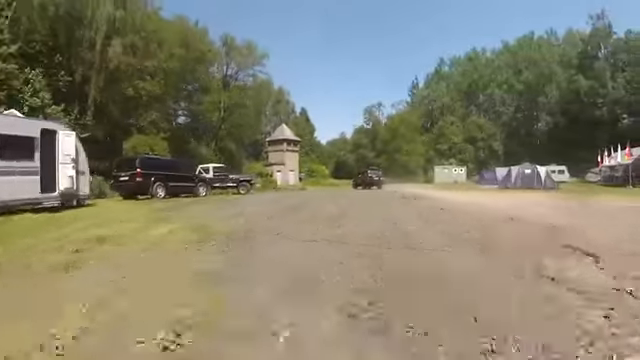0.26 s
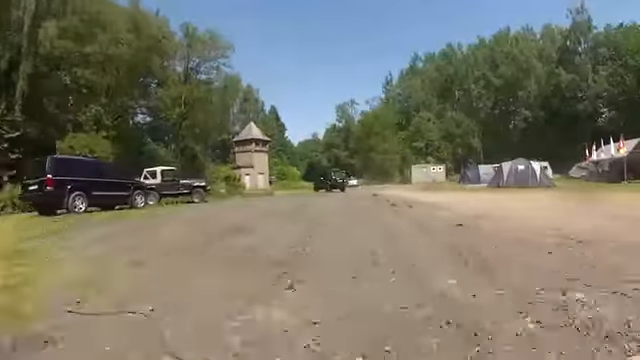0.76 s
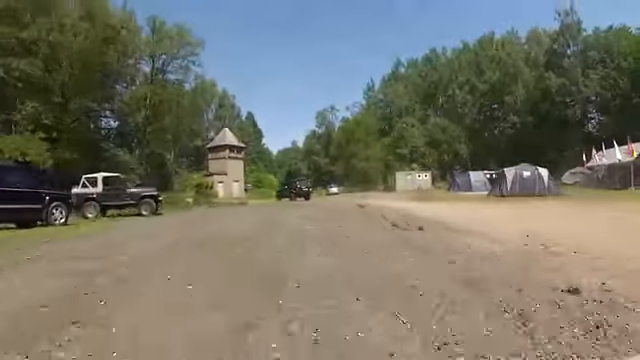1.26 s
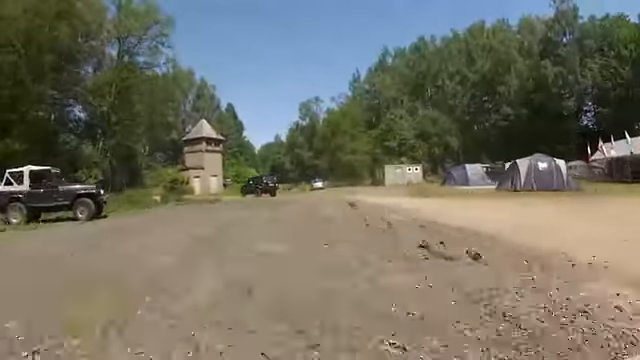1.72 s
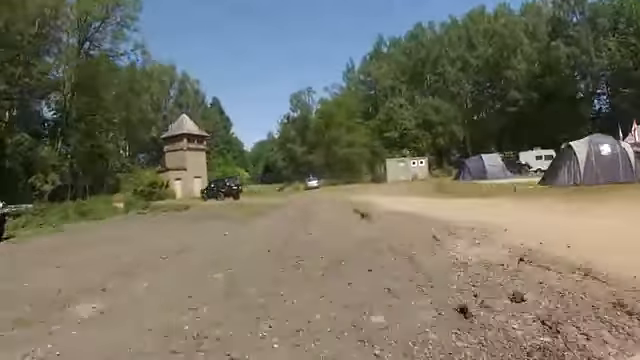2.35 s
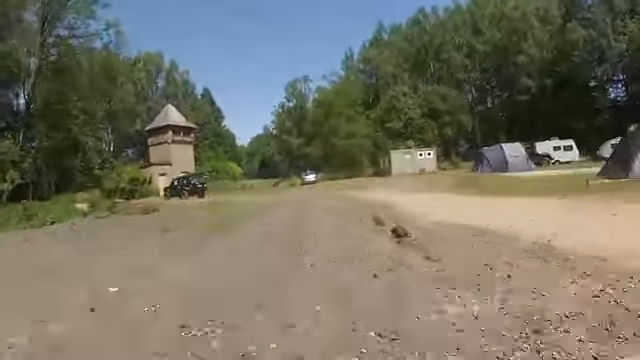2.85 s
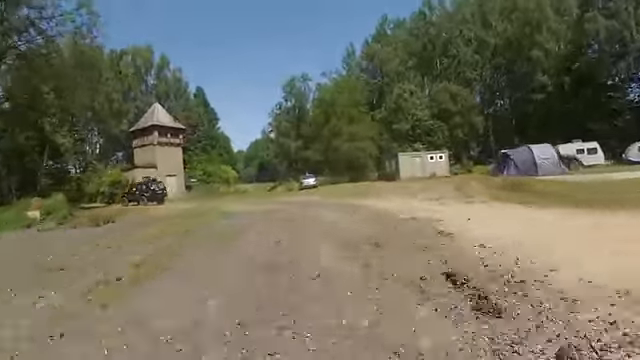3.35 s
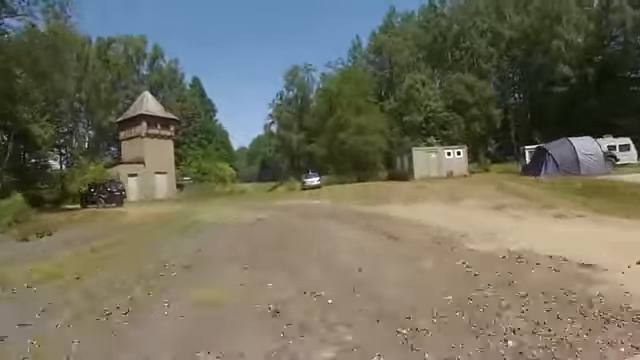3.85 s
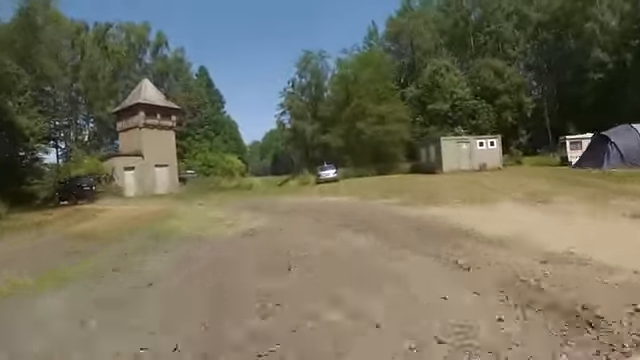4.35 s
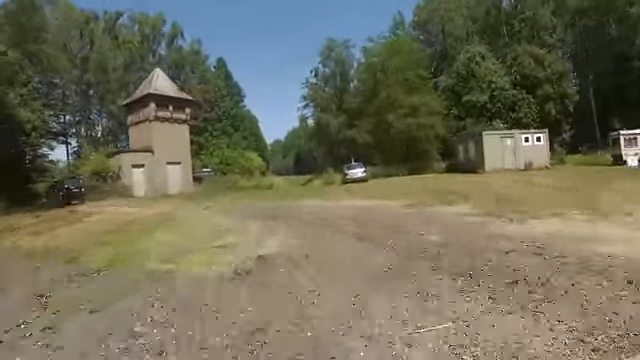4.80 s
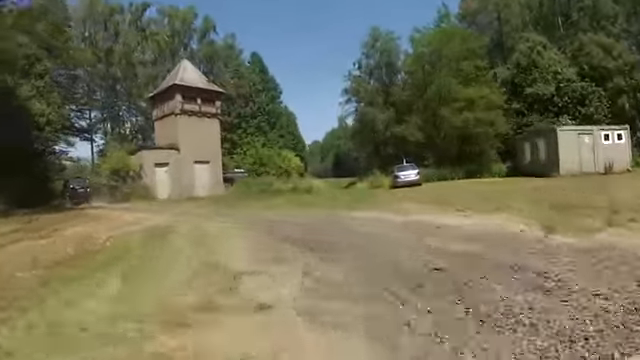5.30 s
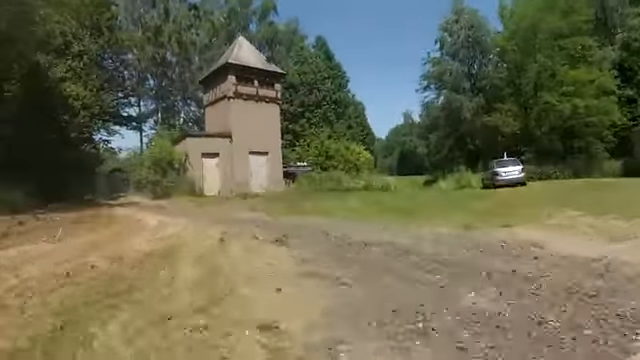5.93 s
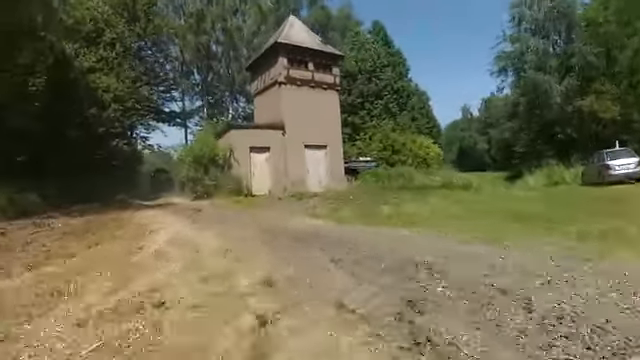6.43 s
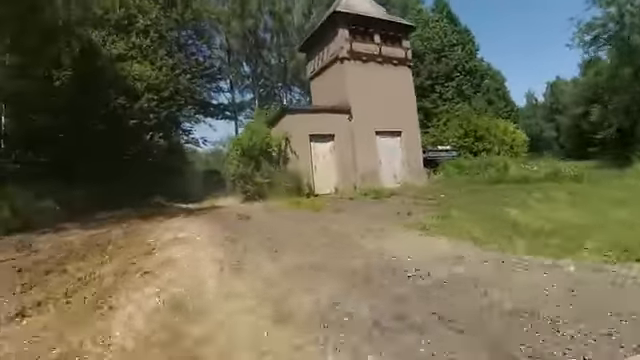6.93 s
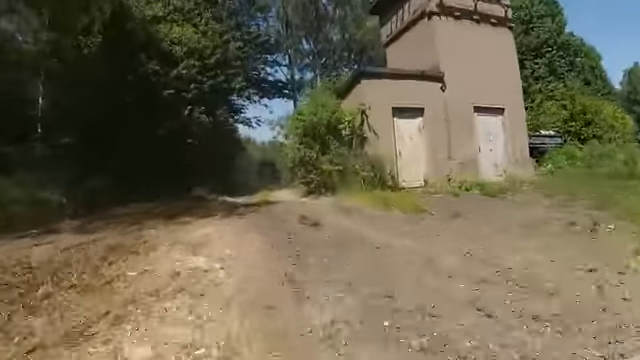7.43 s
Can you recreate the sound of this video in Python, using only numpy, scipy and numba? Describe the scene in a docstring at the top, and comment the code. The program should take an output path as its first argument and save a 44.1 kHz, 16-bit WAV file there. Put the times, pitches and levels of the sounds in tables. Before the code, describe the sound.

Heavy low droning and bumping from a vehicle on a rough track, crackling at its loudest swells, with sharp stone clicks and a brief squeak.

```python
"""A deep wavering boom and shudder come first, over tyre rumble, panel buzz, faint gear whine, hum and hiss.
A camera is bolted to an off-road vehicle rolling over a dirt track: the chassis boom is one unsteady tone,
its shudder and sway are noise in narrow resonances, and engine clatter rings the panels. Stones tick as damped
plate modes, bumps thud as body modes and a joint squeaks briefly. The camera's gain control steps down
on tall boom crests, which crackles."""
import sys
import numpy as np
from scipy import signal
from scipy.fft import rfft, irfft, next_fast_len
from scipy.io import wavfile
from scipy.ndimage import uniform_filter1d, map_coordinates
from numba import njit

SR = 44100
rng = np.random.default_rng(int(sys.argv[2]) if len(sys.argv) > 2 else 0)


def int16_out(signal):
    """Quantize to a 16-bit WAV file."""
    q = np.round(np.clip(np.atleast_2d(signal).T, -1, 1) * 32767)
    wavfile.write(sys.argv[1], SR, q.astype(np.int16))


def makeup_ratio(level_db):
    """Linear amplitude ratio for a level in decibels (20 dB per factor of ten)."""
    decades = np.asarray(level_db, float) / 20
    return 10 ** decades


N = 337806  # samples

# Chassis boom pitch before its random waver: (time [s], frequency [Hz])
BOOM_PITCH = [(0.0, 55.8), (0.79, 50.9), (1.02, 58.1), (1.23, 53.7), (1.73, 58.5), (2.28, 49.8),
              (3.18, 55.5), (3.52, 50.4), (4.29, 54.2), (5.74, 50.8), (6.04, 56.2), (6.19, 49.8),
              (6.63, 53.4), (7.66, 52.5)]
# Ground jolts that knock the boom out of step: (time [s], level aimed at [dB], sag [dB/s])
BOOM_JOLTS = [(.049, -15.5, 0), (.35, -16, 0), (.638, -15, 50), (.754, -14, 50), (.892, -13.5, 50),
              (1.044, -12, 25), (1.423, -11, 35), (1.596, -17, 20), (1.688, -11.5, 60), (1.822, -14.5, 30),
              (1.913, -11, 50), (2.026, -11, 50), (2.247, -11, 35), (2.486, -10.5, 45), (2.623, -14, 35),
              (2.83, -14.5, 5), (2.995, -11, 15), (3.16, -24, 20), (3.235, -12.5, 20), (3.495, -13.5, 50),
              (3.624, -16.5, 30), (3.716, -15, 30), (3.809, -15, 0), (3.985, -13.5, 30), (4.086, -14, 30),
              (4.184, -11.5, 55), (4.313, -17.5, 0), (4.431, -11.5, 40), (4.606, -10.5, 55),
              (4.721, -10, 40), (5.027, -12, 50), (5.148, -10.5, 20), (5.587, -15, 45), (5.731, -11.5, 60),
              (5.85, -11.5, 45), (5.976, -12, 35), (6.157, -9.5, 55), (6.4, -10.5, 55), (6.543, -15, 25),
              (6.688, -11, 55), (7.029, -13, 35), (7.122, -10.5, 50), (7.364, -13.5, 5)]
# Weaker modes beside the boom, each before squaring: (frequency [Hz], width [Hz], level [dB])
FLANK_MODES = [(42.37, 8, -2), (62.65, 7.2, 1)]
# Axle sway resonance, before squaring: (frequency [Hz], width [Hz], level [dB])
SWAY_MODES = [(32.94, 11, 0)]
# Axle sway strength: (time [s], level [dB])
SWAY_LEVEL = [(0, -24), (.5, -28), (1.2, -32), (1.75, -29), (2.2, -21), (2.7, -22), (3.0, -28), (3.7, -23),
              (3.9, -33), (4.5, -27), (5.06, -26), (5.27, -38), (5.45, -23), (6.1, -20), (6.3, -27),
              (6.7, -21), (7.66, -28)]
# Frame modes, relative levels: (frequency [Hz], width [Hz], level [dB])
SHUDDER_MODES = [(86.4, 7.52, 2.5), (102.1, 17, -3.5), (118.3, 10.65, -11), (139.9, 10, -18.5),
                 (148.8, 20, -24.5)]
# Track roughness and engine effort, before bumps add to the first two levels:
# (time [s], frame shudder level [dB], tyre rumble level [dB], panel buzz level [dB])
RUNNING_LEVELS = [(0, -28.5, -46, -51), (.17, -30, -51, -53), (.5, -29, -46.5, -51.5),
                  (1.1, -29, -47.5, -49), (1.27, -36, -48, -52), (1.42, -26, -44, -49),
                  (1.56, -28, -48, -52), (2.05, -26, -42.5, -46), (2.5, -31, -47, -48),
                  (2.8, -26.5, -46, -48.5), (3.05, -27, -44, -50), (3.15, -35, -47, -56),
                  (3.8, -28, -47, -52), (4.0, -35, -51, -54), (4.45, -29, -52, -52), (5.2, -33, -47, -54),
                  (5.45, -38, -53, -57), (5.75, -31, -49, -53), (6.3, -32, -46, -52.5),
                  (6.6, -27, -48, -52), (7.0, -34, -52, -54), (7.66, -32, -48, -52)]
# Tyre rumble spectrum, relative: (frequency [Hz], level [dB per Hz])
TYRE_SPECTRUM = [(130, -0.5), (175, -9), (330, -12.5), (360, -12), (422, -11), (442, -24.5), (800, -31.5),
                 (1500, -46)]
# Panel resonances, before the 3/2 power that sharpens them: (frequency [Hz], width [Hz], level [dB])
PANEL_MODES = [(405.4, 18, 3.5), (596.4, 47, -1.5), (1022.6, 49, 1), (1376, 37, -9), (1400, 98, 1.5),
               (1474, 100, -2), (1978, 66, -1), (2170, 41, 4), (2390, 300, -10.5), (3300, 300, -24.5),
               (4750, 50, -24)]
# Direct engine clatter spectrum, relative: (frequency [Hz], level [dB per Hz])
CLATTER_SPECTRUM = [(400, -16), (800, -10.5), (1700, -7.5), (2300, -8), (2750, -20.5), (3400, -18),
                    (4500, -37), (7000, -50.5), (10000, -62)]
# Gear whine before its flutter: (time [s], frequency [Hz], level [dB])
GEAR_TRACK = [(0, 1355, -58), (.4, 1327, -59), (.7, 1395, -52), (1.1, 1430, -53.5), (1.25, 1440, -86),
              (1.5, 1265, -72.5), (1.65, 1300, -59.5), (1.9, 1333, -55), (2.25, 1297, -56.5),
              (2.5, 1275, -50.5), (2.65, 1304, -79.5), (7.66, 1236, -78.5)]
# Panel hum before its flutter: (time [s], frequency [Hz], level [dB])
HUM_TRACK = [(0, 600.5, -57), (1.2, 598.3, -63.5), (2, 594, -55), (2.8, 598.6, -61), (3.3, 598, -75.5),
             (7.66, 603, -75.5)]
# Thin tones of the camera electronics, ahead of the microphone response: (frequency [Hz], level [dB])
WHINE_LINES = [(9111, -88), (9135, -87)]
# Hiss spectrum, relative: (frequency [Hz], level [dB per Hz])
HISS_SPECTRUM = [(2000, 0), (6000, -6), (10000, -8.5), (15500, -24.5)]
# Stone strikes: (time [s], level [dB], crack relative level [dB], strongest ring [Hz], damping factor [x])
STONE_STRIKES = [(.0458, -20.5, -17.5, 1970, 1.2), (2.827, -35.5, -4.5, 2180, 1.4),
                 (2.8993, -25.5, -29, 1983, 2.05), (2.9263, -22.5, -1.5, 1460, 1.9),
                 (2.9655, -45, -15.5, 1500, 1.8), (3.0645, -19, -24.5, 2440, 1.2),
                 (3.0695, -24, -22, 2303, 1.124), (3.5105, -27.5, -16, 1770, 2.17),
                 (5.094, -44.5, -9, 4643, 1.6), (5.421, -52, -9, 4800, 1.3), (5.672, -29, -27, 1100, 1.22),
                 (5.676, -39, -35, 1997, 1.49), (6.6049, -32.5, -20.5, 1400, 1.656)]
# Modes of the struck plate at damping factor 1: (frequency [Hz], relative level [dB], 60 dB decay time [s])
PLATE_MODES = [(1100, -1.5, 0.04), (1524, 4.5, 0.022), (1680, -0.5, 0.033), (1670, -3, 0.023),
               (2030, 4, .04), (2150, -1.5, 0.053), (2455, -3.5, 0.094), (3340, -12, 0.044),
               (3920, -9, 0.058), (4460, -6, 0.034), (4680, -1, 0.05), (5330, 0.5, 0.033), (7300, -3, .02)]
# Bumps: (time [s], level [dB], upper modes' relative level [dB])
BUMP_BLOWS = [(0.712, -23.5, -15), (0.955, -26, -6), (1.342, -27.5, -15), (1.392, -26, -20),
              (1.593, -26, -10.5), (1.671, -23, -9.5), (1.877, -29.5, 5.5), (2.115, -29, -26),
              (2.196, -26.5, -10), (2.605, -32.5, 4), (3.015, -30, -7), (3.815, -30, -21),
              (4.479, -39, -19), (6.502, -32.5, -19.5), (6.716, -24, -4)]
# Body modes, two low then two upper: (frequency [Hz], 60 dB decay time [s])
BODY_MODES = [(246, 0.19), (268, 0.09), (358, 0.1), (415, 0.11)]
# Squeaking joint before its flutter: (time [s], frequency [Hz], level [dB])
SQUEAK_TRACK = [(1.32, 3060, -85), (1.36, 3110, -62), (1.39, 3310, -55), (1.42, 3170, -61),
                (1.54, 3320, -60), (1.58, 3380, -72), (1.63, 3430, -57), (1.66, 3270, -62),
                (1.7, 3370, -63), (1.74, 3400, -85)]
# Microphone frequency response: (frequency [Hz], level [dB])
MICROPHONE_RESPONSE = [(5, 1), (7000, -1), (11000, -2.5), (15000, -5.5), (16500, -32.5)]


def unit(x):
    """Normalisation: scales a signal to rms 1."""
    return x / np.sqrt(np.mean(x ** 2) + 1e-20)


def curves(rows):
    """Linear interpolation: one value per sample for each column after the time."""
    s, *columns = np.transpose(rows)
    return [np.interp(np.arange(N) / SR, s, column) for column in columns]


def wobble(rate):
    """Band-limited fluctuation: a smooth random curve with rate knots a second."""
    knots = rng.standard_normal(int(N * rate / SR) + 4)
    return map_coordinates(knots, [np.arange(N) * rate / SR])


def filtered(x, response):
    """Linear filtering: the spectrum is multiplied by a complex response of frequency."""
    m = next_fast_len(N + SR // 2)
    hz = np.fft.rfftfreq(m, 1 / SR)
    return irfft(rfft(x, m) * response(hz), m)[:N]


def colour(points):
    """Spectral shaping: gain interpolated on a log frequency axis, shut outside the points."""
    f, db = np.transpose(points)
    return lambda hz: makeup_ratio(np.interp(np.log(hz + 1), np.log(f), db, left=-120, right=-120))


def resonance(hz, centre, width, db):
    """Damped oscillator: the causal response of one mode."""
    return makeup_ratio(db) * 1j * hz * width / (centre * centre - hz * hz + 1j * hz * width)


def modes(rows):
    """Modal superposition: resonances summed with alternating sign."""
    return lambda hz: sum((-1) ** k * resonance(hz, *row) for k, row in enumerate(rows))


def steep(rows):
    """Cascaded resonance: the modal response applied twice, for dark skirts."""
    return lambda hz: modes(rows)(hz) ** 2


def peaks(rows):
    """Uncoupled resonators: separate parts add without cancelling, with dark valleys between them."""
    return lambda hz: np.sqrt(sum(np.abs(resonance(hz, *row)) ** 3 for row in rows))


def swells():
    """Phase interference: each jolt resets the boom about half a turn out of step, so it dips, swells and sags."""
    start_db, lead_s, settle_s = -15, .016, .028
    scatter_rad = .45  # about the half turn
    t = np.arange(N) / SR
    jolts = [(0, start_db, 0)] + [(s - lead_s, db, sag) for s, db, sag in BOOM_JOLTS]
    s, db, sag = np.transpose(jolts)
    turn = np.cumsum(np.pi + scatter_rad * rng.standard_normal(len(s)))
    latest = np.searchsorted(s, t, side="right") - 1
    aim_db = db[latest] - np.abs(sag[latest]) * (t - s[latest])
    aim = makeup_ratio(aim_db) * np.exp(1j * turn[latest])
    keep = np.exp(-1 / (settle_s * SR))
    return signal.lfilter([1 - keep], [1, -keep], aim, zi=[keep * aim[0]])[0]


def kicks():
    """Transient excitation: extra gain on the road noise while a bump dies away."""
    kick_db, rise_s, fall_s = 27, .012, .04
    t = np.arange(N) / SR
    gain = np.ones(N)
    for s, db, _ in BUMP_BLOWS:
        since = np.maximum(t - s, 0)
        gain += makeup_ratio(db + kick_db) * (1 - np.exp(-since / rise_s)) * np.exp(-since / fall_s)
    return gain


def chassis():
    """Structural resonance: one wavering boom tone, with flanks, sway and shudder as noise in narrow modes."""
    (boom_hz,), (sway_db,) = curves(BOOM_PITCH), curves(SWAY_LEVEL)
    shudder_db, _, _ = curves(RUNNING_LEVELS)
    spin = np.exp(2j * np.pi * np.cumsum(boom_hz + 1.5 * wobble(22)) / SR)
    boom = np.sqrt(2) * makeup_ratio(1.3 * wobble(25)) * np.imag(swells() * spin)
    flanks = unit(filtered(rng.standard_normal(N), steep(FLANK_MODES)))
    sway = unit(filtered(rng.standard_normal(N), steep(SWAY_MODES)))

    def frame(hz):
        """High-pass weighting: the frame modes lose their skirts below about 70 Hz."""
        cube = (hz / 70) ** 3
        return modes(SHUDDER_MODES)(hz) * cube / (1 + cube)

    shudder = unit(filtered(rng.standard_normal(N), frame))
    return boom + makeup_ratio(-31.5) * flanks + makeup_ratio(sway_db) * sway + makeup_ratio(shudder_db) * kicks() * shudder


def running():
    """Forced vibration: tyres rumble in lumps; clatter in quick uneven bursts rings the panels."""
    _, tyre_db, buzz_db = curves(RUNNING_LEVELS)
    lumps = makeup_ratio(2.2 * wobble(30)) * rng.standard_normal(N)
    tyres = unit(filtered(lumps, colour(TYRE_SPECTRUM)))
    bursts = makeup_ratio(1.1 * wobble(120) + 0.63 * wobble(19))
    knocks = bursts * rng.standard_normal((2, N))
    ringing = unit(filtered(knocks[0], peaks(PANEL_MODES)))
    direct = unit(filtered(knocks[1], colour(CLATTER_SPECTRUM)))
    buzz = makeup_ratio(0.5) * ringing + makeup_ratio(-2) * direct
    return makeup_ratio(tyre_db) * kicks() * tyres + makeup_ratio(buzz_db) * buzz


def tone(rows, blur_hz, flutter_db, rate):
    """Frequency and amplitude modulation: an unsteady sine along (time [s], frequency [Hz], level [dB]) rows."""
    hz, db = curves(rows)
    level = makeup_ratio(db + flutter_db * wobble(rate))
    return level * np.sin(2 * np.pi * np.cumsum(hz + blur_hz * wobble(rate)) / SR)


def gears():
    """Tonal excitation: the gears sing as one unsteady sine."""
    return tone(GEAR_TRACK, blur_hz=8, flutter_db=2.0, rate=50)


def hum():
    """Tonal panel vibration: a panel hums as one blurred sine."""
    return tone(HUM_TRACK, blur_hz=16, flutter_db=3.5, rate=60)


def whine():
    """Self-noise: the camera electronics hiss evenly under faint thin tones."""
    t = np.arange(N) / SR
    lines = sum(np.sqrt(2) * makeup_ratio(db + 1.5 * wobble(6)) * np.sin(2 * np.pi * hz * t) for hz, db in WHINE_LINES)
    hiss = unit(filtered(rng.standard_normal(N), colour(HISS_SPECTRUM)))
    return lines + makeup_ratio(-77) * hiss


def stones():
    """Impact excitation: each stone favours plate modes near its own contact pitch and cracks briefly."""
    out, t = np.zeros(N + SR), np.arange(SR // 5) / SR
    scatter_db = rng.normal(0, 2.2, (len(STONE_STRIKES), len(PLATE_MODES)))
    for (s, db, crack_db, near_hz, damping), mode_db in zip(STONE_STRIKES, scatter_db):
        ring = np.zeros(len(t))
        for (hz, level, t60), extra_db in zip(PLATE_MODES, mode_db):
            start_db = level + extra_db - 13 * abs(np.log2(hz / near_hz))  # 13 dB down per octave away
            ring += makeup_ratio(start_db - 60 * t * damping / t60) * np.sin(2 * np.pi * hz * t)
        dulled = uniform_filter1d(rng.standard_normal(len(t)), size=3) * 2
        crack = makeup_ratio(crack_db - 60 * t / 0.013) * dulled
        onset = 1 - np.exp(-t / 0.00081)
        out[round(s * SR):][:len(t)] += makeup_ratio(db) * (makeup_ratio(-5.5) * ring * onset + crack)
    return out[:N]


def bumps():
    """Soft impact: the body modes swell over some milliseconds and decay exponentially."""
    out, t = np.zeros(N + SR), np.arange(SR // 2) / SR
    phases = rng.uniform(0, 2 * np.pi, (len(BUMP_BLOWS), len(BODY_MODES)))
    onset = 1 - np.exp(-t / 0.0078)
    for (s, db, upper_db), phase in zip(BUMP_BLOWS, phases):
        levels = [db - 0.5, db - 9.5, db + upper_db - 2.5, db + upper_db - 6.5]
        ring = np.zeros(len(t))
        for (hz, t60), level, p in zip(BODY_MODES, levels, phase):
            ring += makeup_ratio(level - 60 * t / t60) * np.sin(2 * np.pi * hz * t + p)
        out[round(s * SR):][:len(t)] += ring * onset
    return out[:N]


def squeak():
    """Tonal joint vibration: a slightly rough creak from a rapidly wavering sine."""
    return tone(SQUEAK_TRACK, blur_hz=35, flutter_db=3, rate=120)


def scene():
    """Superposition: everything reaches the one microphone through the mount."""
    return (chassis() + running() + gears() + hum() + stones() + bumps() + squeak())[None]


@njit
def stepped_gain(x, gain, ceiling, lag, step, wait, hold, patience):
    """Feedback gain control: gain drops a step at a time while the lagging output level is over the ceiling;
    after a hold it climbs a step at the next zero crossing, silently, or with a tick when none comes in time."""
    out, level, since, calm = np.zeros(len(x)), 0.0, 0.0, 0
    for i in range(1, len(x)):
        level += (abs(gain * x[i]) - level) * lag
        since += wait[i]  # fraction of a clock step
        calm += 1  # samples since the last step
        if level > ceiling and since >= 1:
            gain, since, calm = gain * step, 0.0, 0
        elif level <= ceiling and (calm > patience or (calm > hold and x[i] * x[i - 1] <= 0)):
            gain, calm = min(1.0, gain / step), 0
        out[i] = gain * x[i]
    return out


def band_limit(x):
    """A steep low-pass at the top of the band."""
    return signal.sosfilt(signal.butter(12, 15827, fs=SR, output="sos"), x)


def record(dry):
    """Transduction: stepped gain control, the electronics' own noise, then the microphone response."""
    steps_per_s = 1800 * makeup_ratio(2.5 * wobble(300))  # the step clock is uneven
    held = stepped_gain(makeup_ratio(7) * dry[0], gain=makeup_ratio(-6), ceiling=makeup_ratio(-11.8), lag=1 / (.0016 * SR),
                        step=makeup_ratio(-.55), wait=steps_per_s / SR, hold=.005 * SR, patience=.0115 * SR)
    heard = filtered(held + whine(), colour(MICROPHONE_RESPONSE))
    return band_limit(heard[None])


dry = scene()
out = record(dry)
int16_out(out)
```